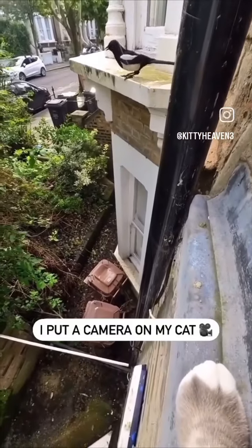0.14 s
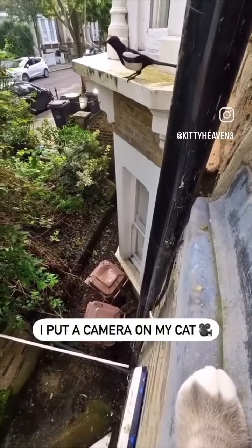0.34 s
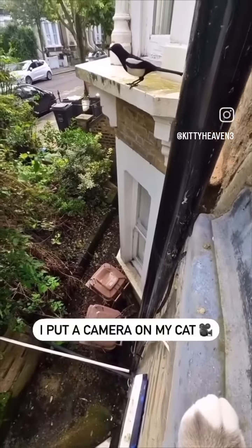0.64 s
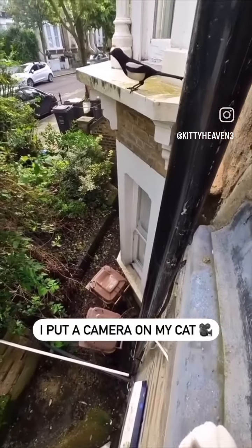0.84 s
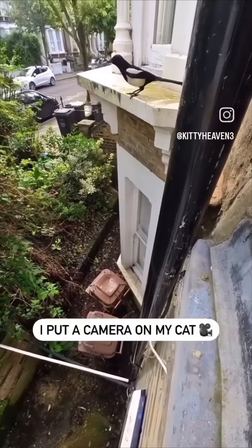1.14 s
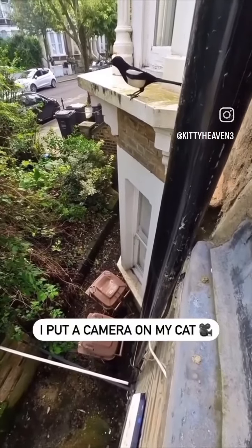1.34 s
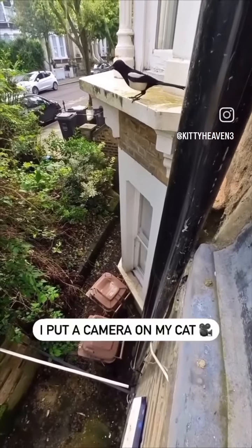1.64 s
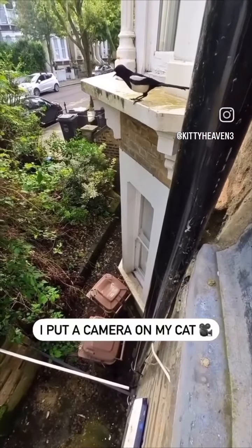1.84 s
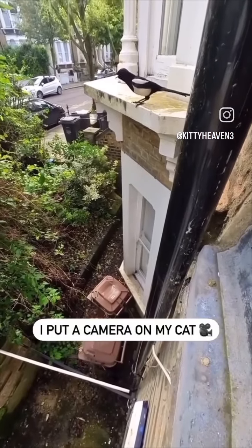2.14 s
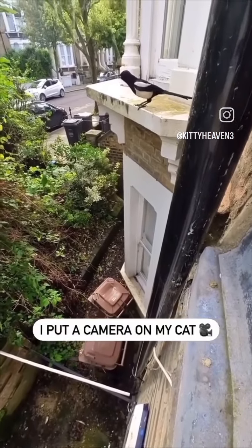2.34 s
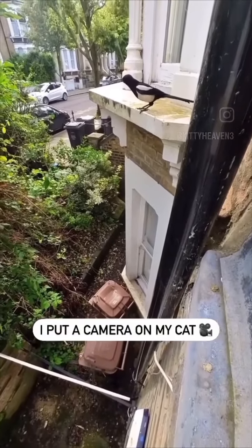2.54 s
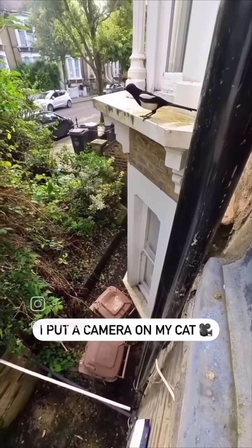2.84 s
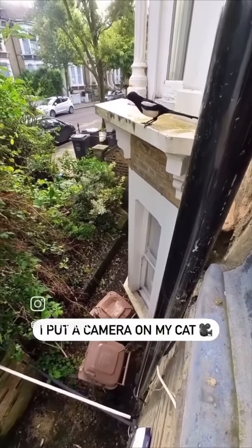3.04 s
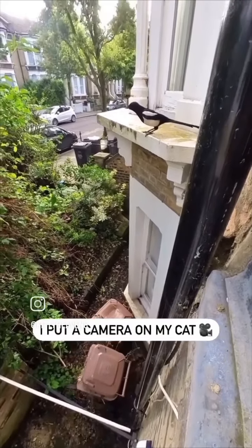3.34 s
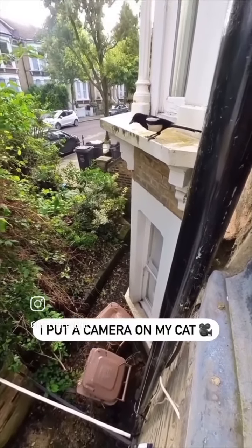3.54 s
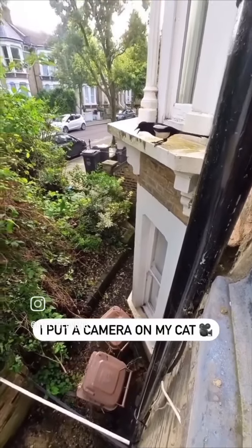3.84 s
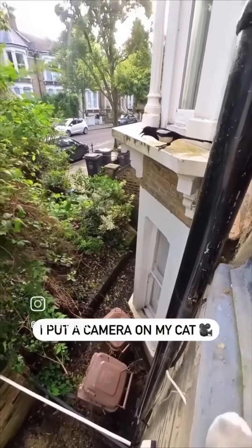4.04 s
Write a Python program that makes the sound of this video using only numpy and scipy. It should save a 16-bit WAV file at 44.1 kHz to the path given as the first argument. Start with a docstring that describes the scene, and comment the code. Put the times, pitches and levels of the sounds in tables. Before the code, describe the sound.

A cat right by the microphone gives one clear meow. A magpie a little farther off answers with a harsh rattling burst that echoes between house fronts. The cat follows with a quick run of hoarse chirps, and the magpie chatters again, more briefly. Faint ticks of paws and collar on the sill come and go over a low rumble of distant traffic.

```python
"""A cat at an open window, right by the microphone: one long clear meow, then a run of hoarse chirps.
Its vocal folds sing through the throat's resonances and flap into a rasp as each note ends.
A magpie on the next ledge answers with two bursts of harsh chatter, its syrinx snapping into
throat and beak, the rattle ringing between the house fronts. Underneath lies a bed of distant
traffic, and the cat's collar and paws tick as it shifts on the sill."""
import sys
import numpy as np
from scipy import signal
from scipy.fft import rfft, irfft
from scipy.io import wavfile

SR = 44100
rng = np.random.default_rng(int(sys.argv[2]) if len(sys.argv) > 2 else 0)


def wav_record(signal):
    """Record a signal, one row per channel, as 16-bit PCM in the file named by sys.argv[1]."""
    frames = np.transpose(np.atleast_2d(signal))
    bounded = np.clip(frames, -1, 1)
    # unit amplitude maps onto the largest positive 16-bit level
    quanta = np.round(bounded * 32767).astype(np.int16)
    wavfile.write(sys.argv[1], SR, quanta)


N = 185127


def amp(db):
    return 10 ** (np.asarray(db) / 20)


def unit(x):
    return x / np.sqrt(np.mean(x ** 2) + 1e-20)


def curve(points, hz):
    """Breakpoint curve on a log-frequency axis."""
    f, value = np.transpose(points)
    return np.interp(np.log(hz + 1), np.log(np.sort(f) + 1), value)


def bells(peaks, hz):
    """Gain in dB of a few EQ bells."""
    return sum(db / (1 + ((hz - centre) / width) ** 2) for centre, width, db in peaks)


def add(mix, s, sound):
    part = mix[round(s * SR):][:len(sound)]
    part += sound[:len(part)]


def eq(x, gain_db, size=4096):
    """Minimum-phase EQ shaped by gain_db(Hz): its peaks ring after each hit."""
    log_gain = np.log(amp(np.maximum(gain_db(abs(np.fft.fftfreq(size, 1 / SR))), -100)))
    taps = np.fft.ifft(np.exp(np.conj(signal.hilbert(log_gain)))).real
    return signal.fftconvolve(x, taps[:size // 2])[:len(x)]


def wander(n, hz):
    """Random modulator, rms about 1, rolled off above hz."""
    f = np.fft.rfftfreq(SR, 1 / SR)
    return unit(irfft(rfft(rng.standard_normal(SR)) * np.exp(-(f / hz) ** 2)))[:n]


# tone of the traffic bed: f/Hz, level/dB
TRAFFIC_EQ = [(12, -41.5), (20, -9), (107, -4.5), (223, -6), (254, -8.5), (464, -10.5), (515, -13),
              (847, -18), (941, -19.5), (1320, -26.5), (1810, -29.5), (2550, -32.5), (5890, -42),
              (8280, -48), (10500, -76), (13600, -103), (22000, -120)]
# distant engines poking out of the rumble: f/Hz, half width/Hz, boost/dB
ENGINE_DRONES = [(83, 14, 2), (314, 19, 6.5)]
# fader ride on the bed: t/s, level/dB
TRAFFIC_FADER = [(0, -34), (2.5, -37.5), (3.6, -38.5), (4.2, -43)]


def traffic():
    """The rumble of the town with a thin hiss of leaves, slowly easing off."""
    hz = np.fft.rfftfreq(N, 1 / SR)
    tone = amp(curve(TRAFFIC_EQ, hz) + bells(ENGINE_DRONES, hz))
    rumble = irfft(rfft(rng.standard_normal(N)) * tone, N)
    return unit(rumble) * amp(np.interp(np.arange(N) / SR, *np.transpose(TRAFFIC_FADER)))


# the magpie's throat: f/Hz, level with beak half shut/dB, level with beak wide/dB
MAGPIE_FORMANTS = [(250, -46, -61.5), (520, -14.5, -21.5), (790, -8, -8.5), (1130, -1.5, -7),
                   (1210, -6, -15), (1620, -3, -11), (2155, -8.5, -9), (2500, -4, -4.5), (3146, -4, -2.5),
                   (3464, -20, -12), (4260, -19, -17.5), (5300, -3, -4.5), (5840, -14, -11),
                   (6630, -17.5, -24), (8200, -24, -22), (8790, -35.5, -27.5), (10360, -58, -50.5)]
# narrow colour peaks in the rattle, strongest with the beak half shut: f/Hz, half width/Hz, gain/dB
NARROW_BELLS = [(1500, 35, 4), (1745, 45, 10), (2150, 90, -5)]


def magpie_syllable(s, spacing, length, db, first_db, beak_hz, lead_db=-13, sag_per_s=2.6):
    """The syrinx snaps open about 110 times a second; after three snaps they blur into a harsh buzz."""
    t = np.arange(-spacing, length + .02, 1 / SR)
    age = (t % spacing) / .0019
    # a faint snap leads in, the next is stronger, the third is full
    snaps = (age * np.exp(1 - age)) ** 2 * amp(first_db * (t < spacing) + lead_db * (t < 0))
    merged = np.clip((t / spacing - 2.1) / .9, 0, 1)
    release = np.clip((length - t) / .005 + .5, 0, 1)
    flow = (snaps * (1 - .72 * merged) + .47 * merged) * release
    opening = np.clip((beak_hz - 2327) / 586, 0, 1)  # the resonance climbs as the beak opens
    f, shut, wide = np.transpose(MAGPIE_FORMANTS)
    throat = np.c_[f, shut + opening * (wide - shut)]
    peaks = [(hz, width, gain_db * (1 - .5 * opening)) for hz, width, gain_db in NARROW_BELLS]
    peaks.append((beak_hz, 100, 6))
    grit = flow * rng.choice([-1., 1.], len(t))
    rattle = unit(eq(grit, lambda hz: curve(throat, hz) + bells(peaks, hz)))
    # each separate snap also pings the beak, a little lower as the syllable goes on
    turns = np.cumsum(beak_hz * (1 - sag_per_s * (t - spacing) + .037 * wander(len(t), 260))) / SR
    ping = unit(snaps * (1 - merged) * np.sin(2 * np.pi * turns))
    return s - spacing, amp(db) * unit(rattle + .33 * ping) * np.sqrt(len(t) / SR / length)


# early reflections off the walls: delay/s, level/dB
WALL_TAPS = [(.007, -8.5), (0.0136, -10.5), (0.02, -18), (.032, -16.5), (0.045, -15.5)]


def walls(x, pane_s=.00398, pane_db=-9, smear_s=.0016):
    """The direct sound, a clean slap off the pane behind the bird, and smeared ones off brick."""
    t = np.arange(0, .03, 1 / SR)
    response = signal.unit_impulse(SR // 8)
    response[round(pane_s * SR)] = amp(pane_db)
    for delay, db in WALL_TAPS:
        echo = rng.standard_normal(len(t)) * np.exp(-t / smear_s)
        add(response, delay, amp(db) * echo / np.linalg.norm(echo))
    heard = signal.fftconvolve(x, response)
    return heard * np.linalg.norm(x) / np.linalg.norm(heard)


# reverb time between the house fronts: f/Hz, t60/s
STREET_DECAY = [(300, 0.71), (1500, 0.53), (3000, 0.81), (6000, 0.5), (10000, 0.32)]


def street(x, build_s=.0062, tails=3):
    """Reverb off the house fronts, wet only; crossfading tails play the air shifting the echo paths."""
    out, phase = np.zeros(len(x)), 2 * np.pi * np.arange(len(x)) / SR
    for k in range(tails):
        scatter = rng.standard_normal(SR) * (rng.random(SR) < .1)
        hz, t, bands = signal.stft(scatter, SR, nperseg=256)
        decay = amp(-60 * t / curve(STREET_DECAY, hz)[:, None])
        tail = signal.istft(bands * decay * (1 - np.exp(-t / build_s)), SR, nperseg=256)[1]
        send = np.sqrt(2 / tails) * np.cos(2 * phase + np.pi * k / tails)  # 2 Hz LFO
        out += signal.fftconvolve(x * send, tail / np.linalg.norm(tail))[:len(x)]
    return out


# magpie cues: t/s, snap spacing/s, length/s, level/dB, first snap trim/dB, beak f/Hz
SYLLABLES = [(-.190, 0.0074, .045, -11.5, -9, 2900), (-.112, .009, 0.042, -16, -6, 2700),
             (1.7178, 0.009, 0.03, -20.5, -5.5, 2497), (1.785, 0.0081, 0.033, -19, -2.5, 2580),
             (1.8438, 0.0096, .045, -19.5, -25, 2610), (1.9194, .0091, 0.05, -18.5, -9, 2610),
             (1.9985, 0.0078, 0.044, -20, -0.5, 2600), (2.078, 0.01, 0.036, -16.5, -2.5, 2694),
             (2.211, .0091, 0.036, -17, -8, 2610), (2.31, 0.0078, 0.047, -18, -5.5, 2527),
             (3.735, .0082, 0.035, -17, -9, 3030), (3.8006, 0.0097, 0.043, -18, -7, 2900),
             (3.881, .011, .034, -20.5, -7.5, 3015), (3.957, 0.012, 0.034, -19, -1.5, 3104),
             (4.032, 0.01, .051, -18, -5, 2953)]
# EQ on the magpie's reverb return: f/Hz, level/dB
RETURN_EQ = [(300, -19.5), (1000, -18), (2200, -8), (3000, -20.5), (4200, -14.5), (5300, -15.5),
             (6500, -3.5), (9000, -4.5)]


def magpie():
    """Chatter bouncing round the street; an earlier call is still ringing out at the start."""
    near = np.zeros(SR + N)  # one second of pre-roll
    for row in SYLLABLES:
        s, syllable = magpie_syllable(*row)
        add(near, 1 + s, walls(syllable))
    reverb = eq(street(near), lambda f: curve(RETURN_EQ, f))
    return (near + reverb)[SR:]


# collar and paw foley: t/s, level/dB, decay/s, centre f/Hz
SILL_TICKS = [(.074, -33, .010, 600), (.4085, -35, .006, 900), (.411, -42.5, .006, 2300),
              (.625, -31, .004, 1250), (.682, -44, .005, 3000), (.698, -52, .01, 3200),
              (1.472, -39.5, .012, 850), (2.574, -29, .004, 800)]


def collar_and_paws(high_cut_hz=7500, width_octaves=.9):
    """Small, dull, close-up contacts as the cat shifts on the sill."""
    out, t = np.zeros(N), np.arange(0, .08, 1 / SR)
    for s, db, decay, hz in SILL_TICKS:
        burst = rng.choice([-1., 1.], len(t)) * np.exp(-t / decay)
        knock = eq(burst, lambda f: -36 * np.log10(1 + (np.log2((f + 1) / hz) / width_octaves) ** 2)
                   - 10 * np.log10(1 + (f / high_cut_hz) ** 6))
        add(out, s, amp(db) * knock * np.linalg.norm(burst) / np.linalg.norm(knock))
    return out


ATTACK_DB, ATTACK_S = -11.5, .0053  # each cat note swells in from below its level
SCOOP_S, BREAK_S = .00655, .011  # how fast it drops onto pitch, and breaks up at the end
# the cat's throat: f/Hz, level in the meow/dB, level in the chirps/dB
CAT_FORMANTS = [(415, 8, -29.5), (804, -1.5, -2.5), (1280, 19.5, 0), (1438, -0.5, -12.5),
                (1620, -1.5, -1.5), (1732, 6, 5), (1995, 1.5, 3.5), (2170, -43.5, -15), (2470, -18, -11),
                (3150, -11, -16.5), (3270, -16, -21), (3300, -24.5, -16.5), (3800, -28.5, -24),
                (4940, -31, -34.5), (5700, -40.5, -32.5), (6430, -34.5, -38.5), (7190, -47, -40),
                (9200, -73.5, -63.5)]
# tone of the cat's breath, in the voice and in the rasp: f/Hz, level/dB
BREATH_EQ = [(180, -33), (300, 1), (572, 1.5), (790, -6), (1040, -2.5), (1480, -8), (2870, 0), (3530, -9.5),
             (4530, -18.5), (5020, -15.5), (6070, -15.5), (8140, -28.5), (10000, -49), (13000, -85),
             (22000, -120)]


def cat_voice(t, hz, effort_db, open_db, rough, formant_column, hiss_db, smear, flutter_db):
    """Harmonics of the vocal folds slide under the throat's resonances; rough spots shake them."""
    throat = np.array(CAT_FORMANTS)[:, [0, formant_column]]
    rough = np.clip(rough, 0, 1)
    # a quick quaver of the folds moves pitch and loudness together
    quaver = np.sqrt(2) * np.sin(2 * np.pi * np.cumsum(85 * (1 + .4 * wander(len(t), 60))) / SR)
    turns = np.cumsum(hz * (1 + rough * (.07 * quaver + .05 * wander(len(t), 450)))) / SR
    voice = np.zeros(len(t))
    for k in range(1, 13):
        # no two closures are alike, so the high harmonics flutter and fray
        flutter = flutter_db * np.log(k) * wander(len(t), 45)
        fray = smear * (k / 6) ** 2 * wander(len(t), 170)
        gain = amp(curve(throat, k * hz) + open_db * (k > 1) + flutter)
        voice += np.sqrt(2) * gain * np.cos(2 * np.pi * (k * turns + rng.random()) + fray)
    voice *= amp(rough * (5 * quaver + 3 * wander(len(t), 250)))
    puffs = rng.standard_normal(len(t)) * (1 + np.cos(2 * np.pi * turns))  # air escapes once a cycle
    hiss = unit(eq(puffs, lambda f: curve(BREATH_EQ, f)))
    fade = np.clip(np.minimum(t - t[0], t[-1] - t) / .0024, 0, 1)
    return t[0], amp(effort_db) * fade * (voice + amp(hiss_db) * np.sqrt(rough) * hiss)


# meow automation: t/s, f/Hz, effort/dB, mouth opening as overtone gain/dB
MEOW_CONTOUR = [(.790, 848, -18.5, -4), (.822, 850, -20, 0), (.850, 789, -18, -7), (0.873, 827, -18.5, -1),
                (0.94, 786.4, -18.5, -2.5), (.962, 805, -18, -1), (1.054, 778, -18.5, 1),
                (1.080, 767, -19.5, -2), (1.095, 757, -33.5, -10.5)]
# voice cracks: t/s, half length/s, pitch dip/octaves, gain/dB, added roughness/0-1
MEOW_CRACKS = [(0.831, 0.0055, 0.044, 4, 0.23), (1.065, 0.0042, 0.12, -6.5, 0.37)]


def cat_meow(scoop_octaves=.073):
    """A clear note that sinks slowly, cracks twice and gives out in a rasp."""
    times, *lanes = np.transpose(MEOW_CONTOUR)
    t = np.arange(times[0], times[-1], 1 / SR)
    hz, effort_db, open_db = (np.interp(t, times, lane) for lane in lanes)
    hz *= 2 ** (scoop_octaves * np.exp(-(t - t[0]) / SCOOP_S))
    effort_db += ATTACK_DB * np.exp(-(t - t[0]) / ATTACK_S)
    rough = .025 + .1 * np.exp((t - t[-1]) / BREAK_S)
    for at, half, dip, db, shake in MEOW_CRACKS:
        crack = np.exp(-((t - at) / half) ** 2)
        hz *= 2 ** (-dip * crack)
        effort_db += db * crack
        rough += shake * crack
    out = np.zeros(N)
    add(out, *cat_voice(t, hz, effort_db, open_db, rough,
                        formant_column=1, hiss_db=-27, smear=.3, flutter_db=2))
    add(out, *cat_rasp(times[-1], length=.028, db=-30.5))
    return out


def cat_rasp(s, length, db, low_cut_hz=550, lead_s=.012, rise_s=.0066, fall_s=.0046):
    """As the voice stops, the slack folds flap irregularly in the escaping air."""
    t = np.arange(-.06, length + .03, 1 / SR)
    turns = np.cumsum(430 * np.exp(.4 * wander(len(t), 400))) / SR
    flaps = np.diff(np.floor(turns), prepend=0) * rng.uniform(.27, 1, len(t))
    drive = unit(flaps - flaps.mean()) + .7 * rng.standard_normal(len(t))
    # a throat this small radiates little bass
    rasp = eq(drive, lambda f: curve(BREATH_EQ, f) - 10 * np.log10(1 + (low_cut_hz / (f + 1)) ** 2))
    gate = 1 / (1 + np.exp(-(t + lead_s) / rise_s)) / (1 + np.exp((t - length) / fall_s))
    swell_db = 87.5 * (t - length / 2)  # grows until the air is cut off
    return s + t[0], amp(db + swell_db) * unit(rasp) * gate


# chirp cues: t/s, length/s, f/Hz, glide/octaves, arch/octaves, effort/dB, swell/dB,
# mouth opening/dB, roughness/0-1, rasp length/s, rasp level/dB
CHIRP_CUES = [(2.652, 0.032, 792, 0.012, 0.019, -21, -1.5, -1, 0.57, .014, -24.5),
              (2.707, 0.044, 796, -0.076, -0.027, -17.5, -5, -0.5, 0.2, 0.022, -25.5),
              (2.769, .046, 714, -0.3, 0.017, -16, -3.5, -3.5, 0, 0.026, -22),
              (2.845, 0.054, 724, -0.049, 0.049, -17, 0.5, -3.5, 0, 0.015, -32.5),
              (2.911, 0.051, 712, -0.12, -.03, -16.5, -3, -4, .24, 0.022, -22),
              (2.994, .115, 744, -.06, .08, -17.5, 8.5, -1.5, 0.07, 0.018, -31),
              (3.129, 0.12, 759.6, -0.034, .11, -17, 3.5, -1, 0.07, 0.024, -27.5),
              (3.281, .108, 798, 0.059, .02, -18, 3.5, -1, 0, 0.045, -27)]


def cat_chirps(scoop_octaves=.187, catch_octaves=.052, duck_db_per_octave=-25.5):
    """Hoarse notes that drop onto their pitch, bend in the middle and break up into a rasp."""
    out = np.zeros(N)
    for s, length, pitch_hz, glide, arch, db, swell_db, open_db, rough, rasp_s, rasp_db in CHIRP_CUES:
        t = np.arange(0, length, 1 / SR)
        along = t / length - .5
        scoop = scoop_octaves * np.exp(-t / SCOOP_S)
        lift = arch * np.exp(-((t / length - .516) / .19) ** 2)
        catch = catch_octaves * np.exp(-((t - length + .0169) / .0051) ** 2)  # dip before the break
        hz = pitch_hz * 2 ** (scoop + glide * along + lift - catch)
        # at the end the voice weakens and roughens, and the mouth closes
        breaking = np.exp((t - length) / BREAK_S)
        attack_db = ATTACK_DB * np.exp(-t / ATTACK_S)
        effort_db = db + swell_db * along + attack_db + duck_db_per_octave * lift - 2.5 * breaking
        add(out, *cat_voice(s + t, hz, effort_db, open_db - 3 * breaking, rough + .48 * breaking,
                            formant_column=2, hiss_db=-12, smear=1.35, flutter_db=1.82))
        add(out, *cat_rasp(s + length, rasp_s, rasp_db))
    return out


# two overtone flares, then two squeaks: peak t/s, level/dB, half length/s, f/Hz
FLARE_AND_SQUEAK_CUES = [(2.802, -18.5, .007, 1932), (2.937, -28, .008, 2080), (3.405, -34.5, 0.025, 5120),
                         (3.489, -44, 0.012, 2040)]


def cat_flares_and_squeaks():
    """Brief bright flares of the chirps' overtone near 2 kHz, and two faint thin squeaks at the end."""
    out = np.zeros(N)
    for s, db, half, hz in FLARE_AND_SQUEAK_CUES:
        t = np.arange(-2 * half, 2 * half, 1 / SR)
        turns = np.cumsum(hz * (1 + .04 * wander(len(t), 400))) / SR
        tone = unit(np.sin(2 * np.pi * turns))
        add(out, s + t[0], amp(db) * tone * np.exp(-(t / half) ** 2))
    return out


def scene(cat_reverb_db=-32):
    """Mono mix: the cat up front and almost dry, the magpie out among the walls."""
    cat = cat_meow() + cat_chirps() + cat_flares_and_squeaks()
    return (cat + amp(cat_reverb_db) * street(cat) + magpie() + collar_and_paws() + traffic())[None]


def record(dry, ceiling=.88, high_cut_hz=10600):
    """A soft clip rounds the loudest peaks, then a steep high cut takes off the top."""
    clipped = dry / (1 + (dry / ceiling) ** 6) ** (1 / 6)
    high_cut = signal.firwin(511, high_cut_hz, window=("kaiser", 9), fs=SR)
    return signal.oaconvolve(clipped, high_cut[None], "same")


dry = scene()
out = record(dry)
wav_record(out)
```